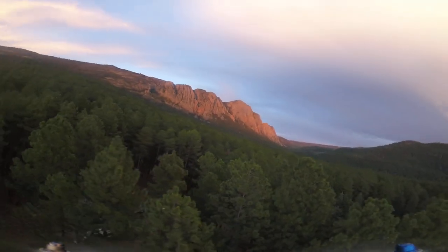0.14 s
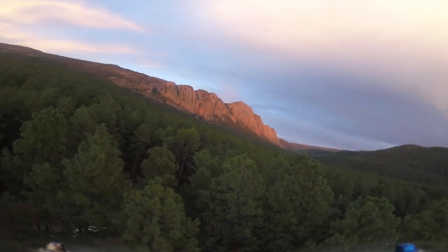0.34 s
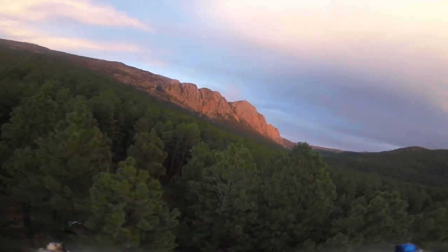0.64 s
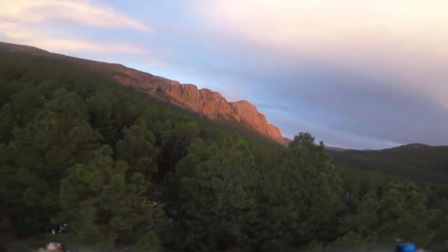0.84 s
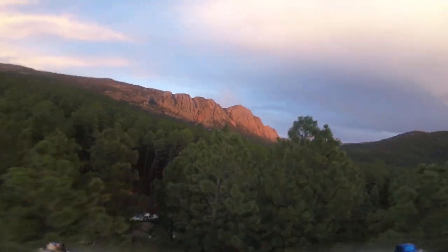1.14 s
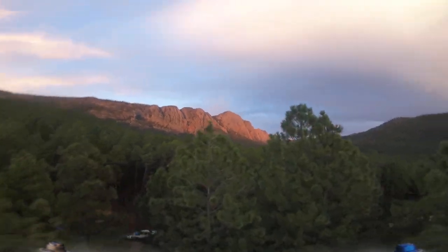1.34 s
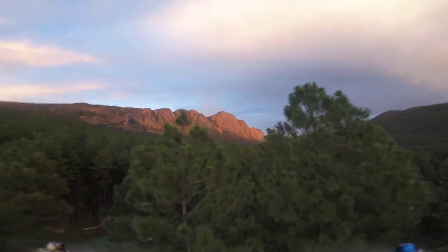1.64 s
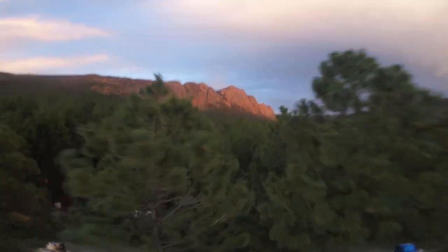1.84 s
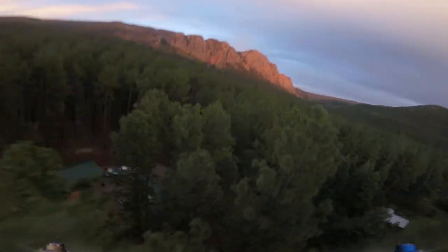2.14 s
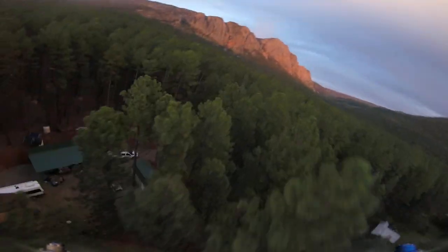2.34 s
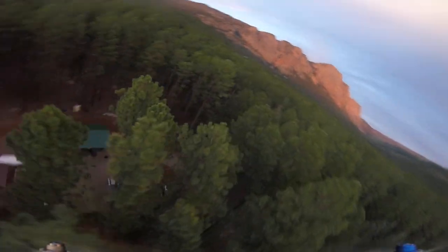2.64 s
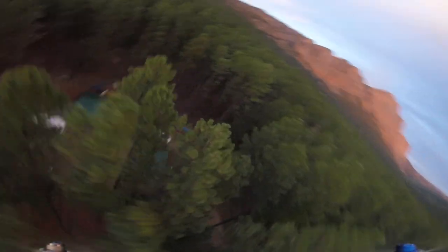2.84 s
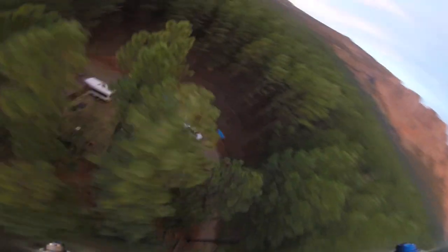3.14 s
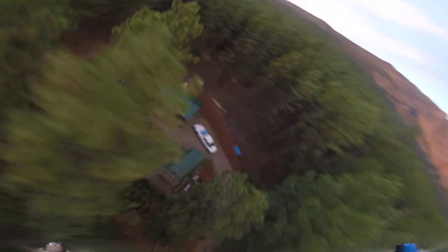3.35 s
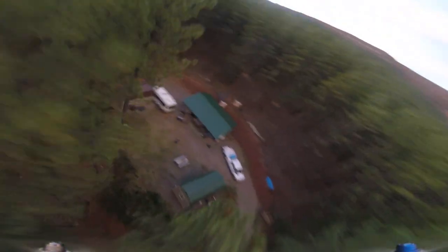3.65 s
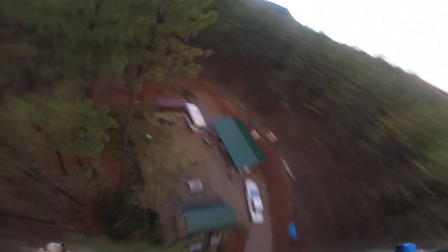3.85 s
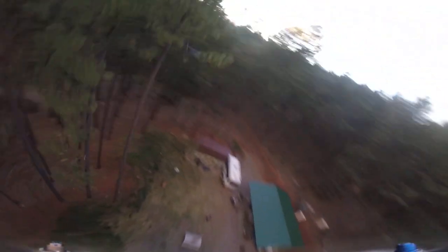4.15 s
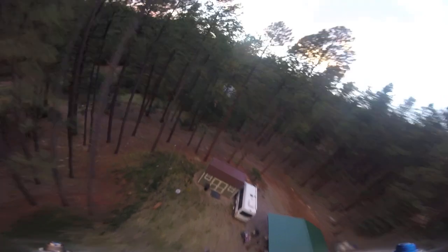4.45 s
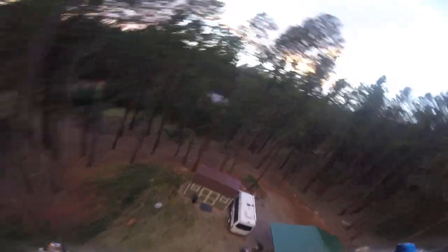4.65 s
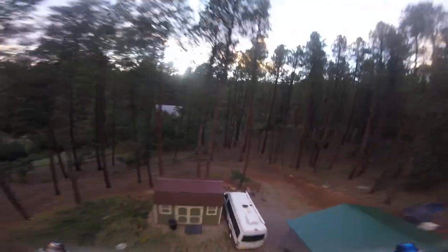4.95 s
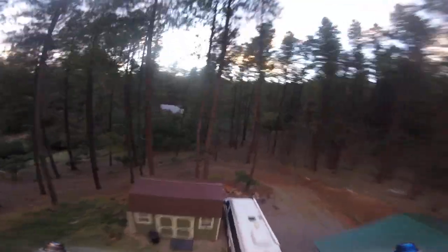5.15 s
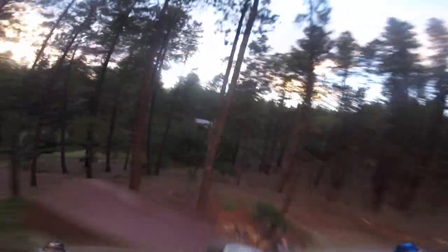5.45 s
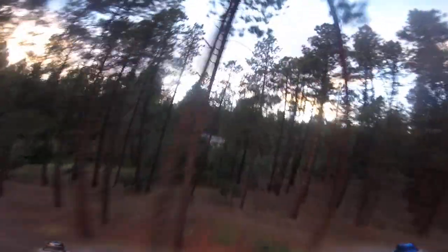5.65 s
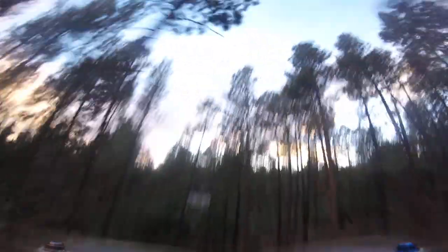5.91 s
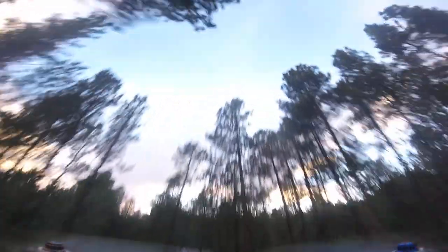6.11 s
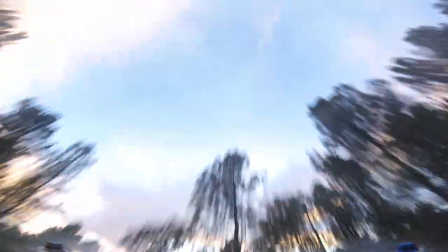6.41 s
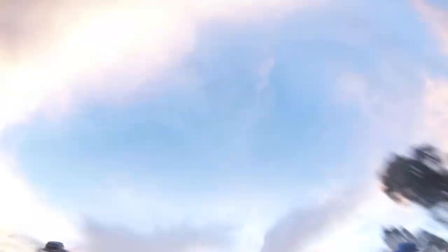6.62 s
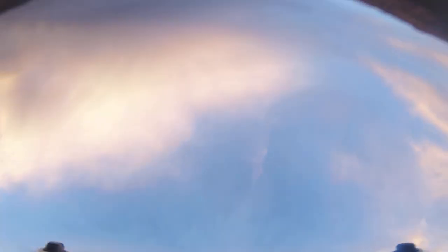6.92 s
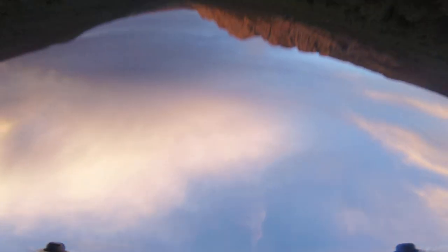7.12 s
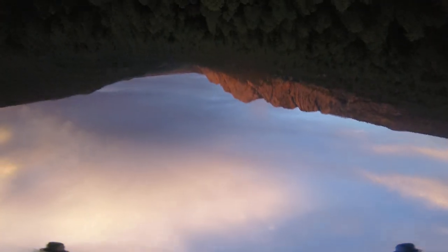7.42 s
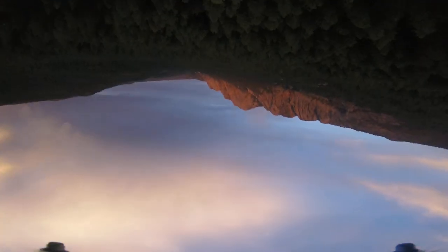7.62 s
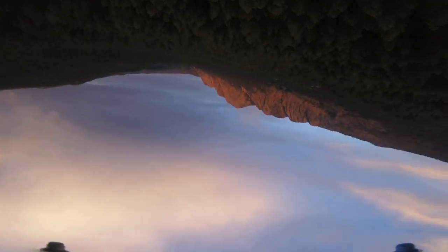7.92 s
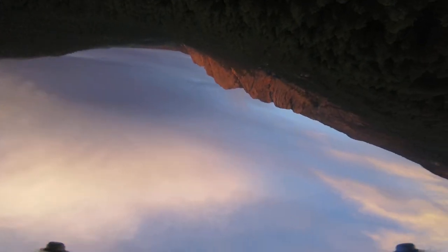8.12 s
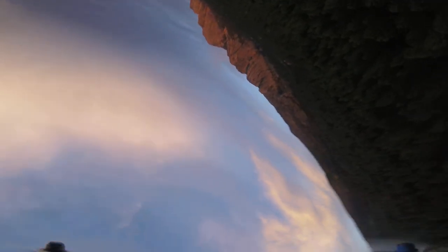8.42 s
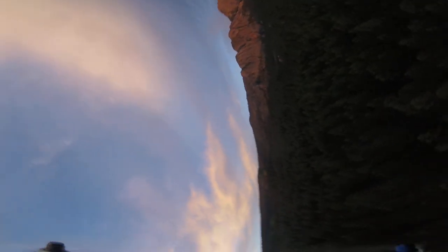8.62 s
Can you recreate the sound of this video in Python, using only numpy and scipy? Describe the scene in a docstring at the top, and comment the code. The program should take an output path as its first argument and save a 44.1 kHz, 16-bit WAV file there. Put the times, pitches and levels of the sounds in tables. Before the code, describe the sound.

Close drone propellers buzz and hiss, rising to a scream and falling to a low flutter, with wind rumbling on the microphone.

```python
"""A buzzing, beating drone swoops up and down in pitch: a racing quadcopter, heard from its own camera.
Four two-blade propellers run at slightly different speeds and chop turbulent air into roar and hiss.
They scream at full throttle and flap at idle. Magnets passing the stators add a faint motor whine;
the frame hums and ticks. Wind rumbles on the microphone and hisses across the case in a banked turn."""
import sys
import numpy as np
from scipy.fft import rfft, irfft, next_fast_len
from scipy.io import wavfile
from scipy.ndimage import uniform_filter1d, minimum_filter1d, map_coordinates

SR = 44100
rng = np.random.default_rng(int(sys.argv[2]) if len(sys.argv) > 2 else 0)


def dump(signal):
    """Clip the signal to [-1, 1] and save it as 16-bit WAV at the path in sys.argv[1]."""
    limited = np.clip(np.atleast_2d(signal).T, -1, 1)
    pcm = np.round(limited * 32767).astype(np.int16)
    wavfile.write(sys.argv[1], SR, pcm)


N = 386757


def amp(db):
    """Decibels to gain."""
    return 10 ** (np.asarray(db) / 20)


def unit(x):
    """Scale to rms 1."""
    return x / np.sqrt(np.mean(x ** 2) + 1e-20)


def steadied(x, window_s):
    """Rms 1 over a sliding window; faster beats stay."""
    return x / np.sqrt(np.abs(uniform_filter1d(x ** 2, int(window_s * SR))) + 1e-9)


def curves(rows):
    """One per-sample curve for each column after the time."""
    times_s, *columns = np.transpose(rows)
    return [np.interp(np.arange(N) / SR, times_s, column) for column in columns]


def wobble(rate_hz):
    """Smooth random curve, rate_hz knots a second."""
    knots = rng.standard_normal(int(N * rate_hz / SR) + 4)
    coarse = np.arange(0, N, 16)
    return np.interp(np.arange(N), coarse, map_coordinates(knots, [coarse * rate_hz / SR]))


def filtered(x, response):
    """Apply a gain given as a function of frequency."""
    size = next_fast_len(N + SR // 2)
    return irfft(rfft(x, size) * response(np.fft.rfftfreq(size, 1 / SR)), size)[:N]


def coloured(x, spectrum):
    """Filter by (Hz, dB) points joined on a log frequency axis."""
    points_hz, points_db = np.transpose(spectrum)
    return filtered(x, lambda hz: amp(np.interp(np.log(hz + 1), np.log(points_hz + 1), points_db)))


def noise(spectrum, gate=1):
    """Noise, gated, coloured and scaled to rms 1."""
    return unit(coloured(gate * rng.standard_normal(N), spectrum))


# throttle, propeller 1: (time [s], blade-pass rate [Hz])
THROTTLE = [(0, 250.6), (.82, 250.7), (1.25, 295), (1.56, 290), (1.93, 343), (2.0, 492), (2.055, 546.4),
            (2.11, 502), (2.25, 135.5), (3.05, 127.4), (3.14, 162), (3.2, 204), (3.27, 246), (3.42, 312),
            (3.5, 332), (3.76, 355), (3.84, 245), (3.95, 195), (4.1, 257), (4.32, 326), (4.65, 289),
            (4.85, 274), (5.11, 222), (5.2, 268), (5.28, 331), (5.47, 367), (5.6, 333), (5.75, 399),
            (5.87, 438), (6.03, 551), (6.14, 563), (6.32, 562), (6.38, 592), (6.83, 586), (6.88, 552),
            (6.95, 461), (7.03, 366), (7.19, 127.8), (7.45, 110.2), (8.3, 164), (8.45, 282), (8.77, 334.3)]


def blade_rate_hz():
    """Blade-pass rate of propeller 1; rotor inertia rounds the corners."""
    return uniform_filter1d(curves(THROTTLE)[0], size=1300)


def speed_gain_db(knee_hz, below_db_per_oct, above_db_per_oct, lead_s=0):
    """Level against blade rate, two slopes about a knee; torque leads speed by lead_s."""
    t = np.arange(N) / SR
    octaves = np.log2(np.interp(t + lead_s, t, blade_rate_hz()) / knee_hz)
    return below_db_per_oct * np.minimum(octaves, 0) + above_db_per_oct * np.maximum(octaves, 0)


# blade-rate offsets from propeller 1: (time [s], second [Hz], third [Hz], fourth [Hz])
STEERING = [(0, -4, 3, -30), (.8, -4, 4, -14), (1.15, -7, 13, -12), (1.8, -8, 20, -14),
            (2.06, -8, -25, -38), (2.4, -10, 10, -20), (3.2, 46, -22, 12), (3.36, 44.5, -6, 14),
            (3.52, 4.5, -22, 9), (3.76, 4, -30, -24), (3.95, -4.5, -8, 8.5), (4.15, 7.5, -8, 42),
            (4.3, 14, -22, 47), (4.5, 8, -24, 23.5), (4.75, -6, -24, 24), (4.86, -1, -20, 16),
            (4.98, -4, -18, 12), (5.15, -8, -5, 17.5), (5.3, -7, -16, 10), (5.5, 9, -28, -15),
            (5.75, -9, -52, -20), (6.05, -11, -42.5, -52.5), (6.3, -8, -48, -55.5), (6.4, -6, -52, -45.5),
            (6.82, -5, -50, -47), (6.94, 30, -8, 13), (7.05, 26, -10, 10), (7.2, -8.5, -25, 6),
            (7.65, -5.5, -14, 10), (8.35, -15, -21, 10.5), (8.52, -12, -53.5, 12), (8.62, -7, -22, 15),
            (8.72, -13.5, 22.5, -30.5)]
# levels against propeller 1: (time [s], second [dB], rear pair [dB])
LOAD = [(0, -4.5, -12.5), (1.1, -3.5, -8), (2.0, -7.5, -5), (3.25, -1.5, -10.5), (3.55, -12, -1.5),
        (3.8, -8.5, -5), (4.2, -9.5, -2.5), (4.7, -6, -6.5), (5.0, -6, -7), (5.4, -3, -4.5),
        (5.8, -12, -10.5), (6.1, -3, -2.5), (6.6, -5, -4), (6.95, -4, -11.5), (7.6, -2, -8.5),
        (8.77, -6.5, -3.5)]


def rotors(fourth_db=-3, hunt=0.004, flutter=0.0059, full_hz=520, kick=0.31, kick_hz=14, idle_hz=165):
    """(shaft angle, gain) per motor; near idle the controller kicks each one and it coasts down."""
    blade_hz = blade_rate_hz()
    second_db, rear_db = curves(LOAD)
    idling = 1 / (1 + (blade_hz / idle_hz) ** 10)
    headroom = 1 / (1 + (blade_hz / full_hz) ** 10)  # speed steadies at full throttle
    motors = []
    for offset_hz, db in zip([0, *curves(STEERING)], [0, second_db, rear_db, rear_db + fourth_db]):
        coast = .5 - np.cumsum(kick_hz * amp(2 * wobble(5)) / SR) % 1  # falling sawtooth
        wander = hunt * wobble(25) + flutter * wobble(160)
        shaft_hz = (blade_hz + offset_hz) / 2 * (1 + headroom * wander + kick * idling * coast)
        angle = 2 * np.pi * np.cumsum(shaft_hz) / SR + rng.uniform(0, 2 * np.pi)
        motors.append((angle, amp(db)))
    return motors


# wind on the microphone: (time [s], level [dB])
RUMBLE_LEVEL = [(0.03, -35), (0.1, -40), (0.7, -39.5), (1.3, -36), (1.54, -33), (1.75, -43), (2.15, -36.5),
                (2.36, -35.5), (2.55, -34.5), (2.73, -31.5), (2.92, -27.5), (3.3, -29), (3.62, -35.5),
                (3.88, -44), (4.2, -31.5), (4.32, -29), (4.43, -30.5), (5.02, -35), (5.65, -31),
                (6.72, -38), (6.87, -35.5), (7.65, -31.5), (7.88, -34.5), (7.97, -30.5), (8.16, -31),
                (8.35, -31), (8.55, -35.5), (8.7, -26), (8.77, -28.5)]
# its spectrum: (frequency [Hz], gain [dB])
RUMBLE_SPECTRUM = [(10, -23.5), (25, -10), (50, -3), (90, -4.5), (180, -8.5), (350, -10.5), (700, -18.5),
                   (1300, -29), (4000, -82.5), (11000, -110)]
# air across a case edge: (time [s], level [dB])
EDGE_LEVEL = [(3.0, -70), (3.23, -39), (3.72, -35.5), (3.9, -57), (4.101, -50.5), (4.6, -73)]
# its spectrum: (frequency [Hz], gain [dB])
EDGE_SPECTRUM = [(2300, -29), (3500, -3), (4600, 2.5), (5500, -2.5), (6050, -8.5), (6500, 2.5),
                 (7100, -6.5), (8500, -11), (9600, -18.5), (10600, -39)]
# even hiss of passing air: (time [s], level [dB])
AIR_LEVEL = [(0, -63), (2.3, -62), (2.9, -56.5), (5.05, -66), (7.2, -50.5), (8.3, -54)]
# its spectrum: (frequency [Hz], gain [dB])
AIR_SPECTRUM = [(1500, -40), (3000, -2), (4000, -3.5), (4900, -2), (5700, -5.5), (6500, -11), (8000, -18.5),
                (9500, -30), (10700, -48), (11600, -63.5)]


def airflow(buffet_db=5.0, lump_db=1.5):
    """Wind buffets the microphone, hisses past the case and, in the banked turn, over one edge."""
    downwash_db = speed_gain_db(knee_hz=253, below_db_per_oct=2, above_db_per_oct=6)
    rumble = unit(amp(lump_db * wobble(14)) * noise(RUMBLE_SPECTRUM))
    buffet = amp(curves(RUMBLE_LEVEL)[0] + buffet_db + downwash_db) * rumble
    edge_db = np.interp(np.arange(N) / SR, *np.transpose(EDGE_LEVEL), left=-120, right=-120)
    return buffet + amp(edge_db) * noise(EDGE_SPECTRUM) + amp(curves(AIR_LEVEL)[0]) * noise(AIR_SPECTRUM)


# ticks on the frame: (time [s], level [dB])
TICKS = [(0.387, -43.5), (0.571, -40), (0.922, -37.5), (1.3763, -38.5), (4.3987, -41), (4.441, -35.5),
         (4.765, -44), (5.786, -34.5), (6.5792, -37)]
# their spectrum: (frequency [Hz], gain [dB])
TICK_SPECTRUM = [(1000, 7), (5000, -1), (8500, 1), (11500, -11)]


def frame_ticks(gain_db=4, t60_s=0.0083):
    """Tiny dry ticks: fast-decaying noise bursts."""
    out = np.zeros(N + SR)
    t = np.arange(SR // 50) / SR
    for start_s, db in TICKS:
        burst = amp(db + gain_db - 60 * t / t60_s) * rng.standard_normal(len(t))
        out[round(start_s * SR):][:len(t)] += burst
    return coloured(out[:N], TICK_SPECTRUM)


# magnet poles passing stator teeth: (order [x shaft rate], level [dB])
COGGING = [(56, -58), (84, -64)]
# motor bell response: (frequency [Hz], gain [dB])
BELL_RESPONSE = [(2000, -29.5), (3300, -2.5), (4200, -3.5), (5000, 2), (5900, 2.5), (6250, -15.5),
                 (7000, -6.5), (8000, -25.5), (10000, -35.5), (10600, -25.5), (11200, -55)]


def motor_whine(motors, gain_db=-5, flicker_db=3, bearing_db=-62):
    """The motor bells sing as their magnets pass the stator, over a faint bearing hiss."""
    cogging = sum(gain * amp(db + flicker_db * wobble(47)) * np.sin(round(order) * angle)
                  for angle, gain in motors for order, db in COGGING)
    spin_db = speed_gain_db(knee_hz=262, below_db_per_oct=4, above_db_per_oct=0.5)
    whine = amp(gain_db + spin_db) * coloured(cogging, BELL_RESPONSE)
    return whine + amp(bearing_db) * noise(BELL_RESPONSE)


# upper cogging tone: (time [s], level [dB])
HIGH_WHINE_LEVEL = [(0, -74), (.85, -73), (.95, -90), (1.1, -120)]


def high_whine(flicker_db=2, jitter_rad=0.9):
    """In the opening level flight, the upper cogging tone holds as one thin line."""
    angle = np.pi * np.cumsum(blade_rate_hz()) / SR
    envelope = amp(curves(HIGH_WHINE_LEVEL)[0] + flicker_db * wobble(30))
    return envelope * np.sin(COGGING[1][0] * angle + jitter_rad * wobble(90))


# motor chirps: (time [s], length [s], shaft start [Hz], shaft end [Hz], level [dB], upper vs lower [dB])
CHIRPS = [(2.203, .035, 68, 52, -46, -12), (2.255, .06, 69, 52, -56, -8), (2.353, .07, 65, 57, -69, 2),
          (2.445, .06, 72, 57, -62, -5), (2.48, .035, 73, 65, -65, 5), (2.525, .04, 69, 62, -63, -8),
          (2.565, .05, 62, 72, -58, -6), (2.655, .09, 62.4, 53, -61, 5), (2.675, .05, 67, 58, -60, 6),
          (2.873, .11, 69, 64, -56, -6)]


def motor_chirps(gain_db=1):
    """After the throttle cut, single motors coast and catch; both cogging tones glide with the shaft."""
    out = np.zeros(N)
    for start_s, length_s, start_hz, end_hz, db, upper_db in CHIRPS:
        count = int(length_s * SR)
        angle = 2 * np.pi * np.cumsum(np.linspace(start_hz, end_hz, count)) / SR
        tones = np.sin(COGGING[0][0] * angle) + amp(upper_db) * np.sin(COGGING[1][0] * angle)
        out[round(start_s * SR):][:count] += amp(db + gain_db) * np.sqrt(np.hanning(count)) * tones
    return out


# frame hums: (centre [s], half length [s], motor [0-3], order [x shaft rate], level [dB])
HUMS = [(2.365, 0.018, 0, 3, -26.5), (3.59, 0.25, 0, 1, -27), (4.86, 0.033, 1, 4, -24.5),
        (4.972, 0.061, 2, 4, -20.5), (5.147, 0.03, 2, 4, -23.5), (7.399, .12, 2, 2, -29),
        (7.642, 0.077, 2, 2, -25), (8.343, 0.02, 0, 2, -23), (8.72, 0.024, 0, 1, -16.5)]


def frame_hum(motors):
    """One motor briefly sets the frame humming at a single shaft order."""
    t = np.arange(N) / SR
    out = np.zeros(N)
    for centre_s, half_s, motor, order, db in HUMS:
        angle, _ = motors[round(motor)]
        swell = amp(db) * np.exp(-((t - centre_s) / half_s) ** 2)
        out += swell * np.sqrt(2) * np.sin(round(order) * angle)
    return out


# churn of the air at the blades, least in the banked turn: (time [s], level [dB])
CHURN = [(0, 2.5), (1.0, 3.5), (1.5, 2.5), (1.7, 5), (1.9, 9), (2.0, 1.5), (2.08, -1.5), (2.19, 3),
         (2.33, -2), (2.58, -1.5), (2.68, 3), (3.03, 2.5), (3.11, 8.5), (3.23, 2), (3.6, -9.5), (3.88, -10),
         (4.05, -3), (4.3, 1.5), (5.08, 1), (5.27, 1), (5.55, -1.5), (5.7, 1), (5.85, 0.5), (6.1, -1),
         (6.8, -2), (6.98, -2), (7.1, -4), (7.33, -1), (7.5, 7), (7.7, 2.5), (8.25, 3.5), (8.45, 4),
         (8.58, 6.5), (8.77, -1)]
# low blade roar: (frequency [Hz], gain [dB])
ROAR_SPECTRUM = [(60, -19.5), (170, -0.5), (400, 12.5), (750, 7), (1080, 9.5), (1320, -10), (1700, -28.5),
                 (4000, -57.5), (11000, -100)]
# midrange wash: (frequency [Hz], gain [dB])
WASH_SPECTRUM = [(700, -26.5), (1100, -7), (1320, -5.5), (1550, 1.5), (2100, 1.5), (2650, 0), (2850, -7.5),
                 (3050, -23.5), (3400, -21.5), (4000, -44), (8000, -64), (11500, -91.5)]
# blade hiss: (time [s], level [dB])
HISS_LEVEL = [(0, 3), (1.5, 1.5), (1.85, 6.5), (1.93, 4.5), (2.02, -3.5), (2.2, 3), (2.6, 1), (3.1, 17),
              (3.2, 3), (3.32, 2), (3.6, -4), (3.9, -10), (4.3, 5), (5.1, 1), (5.4, 0.5), (5.75, 3.5),
              (6.1, 1), (6.86, -0.5), (6.97, 5), (7.04, 0), (7.15, 3), (8.45, 5), (8.6, 1.5), (8.77, -3)]
# its spectrum: (frequency [Hz], gain [dB])
HISS_SPECTRUM = [(1500, -38.5), (3000, 5.5), (4000, -4), (4900, -3), (5700, -7), (6500, -13), (8000, -19),
                 (9500, -29), (10700, -34.5), (11600, -61.5)]


def turbulence(motors, roar_db=-30, roar_share=0.89, wash_db=-25.5, hiss_db=-35, chop=0.38, gust_db=1.02):
    """Each blade pass sheds a noise puff that grows with speed; roar and wash also grow with churn."""
    churn_db = curves(CHURN)[0]
    speed_db = speed_gain_db(knee_hz=266, below_db_per_oct=13, above_db_per_oct=6.5, lead_s=0.0064)
    hiss_speed_db = speed_gain_db(knee_hz=357.6, below_db_per_oct=20.5, above_db_per_oct=10, lead_s=0.021)
    puffs = sum(gain * np.exp(chop * np.cos(2 * angle)) for angle, gain in motors)
    puffs = steadied(puffs, window_s=0.17) * amp(gust_db * wobble(60))
    roar = amp(roar_db + roar_share * churn_db + speed_db) * noise(ROAR_SPECTRUM, puffs)
    wash = amp(wash_db + churn_db + speed_db) * noise(WASH_SPECTRUM, puffs)
    hiss = amp(hiss_db + curves(HISS_LEVEL)[0] + hiss_speed_db) * noise(HISS_SPECTRUM, puffs)
    return roar + wash + hiss


# sharp tip pulses: (order [x shaft rate], level [dB])
TIP_PARTIALS = [(4, -18.5), (6, -17), (8, -24), (14, -34.5), (16, -34.5), (18, -35.5), (20, -41.5)]


def tip_scream(motors, onset_hz=435, rough_db=1.5, gain_db=-5, third_db=-10, sum_db=-25):
    """Near top speed the tips of propellers 1 and 3 add bright lines; their wakes meet in a sum tone."""
    flat_out = 1 / (1 + (onset_hz / blade_rate_hz()) ** 10)
    first, third = motors[0][0], motors[2][0]
    tips = sum(amp(gain_db + motor_db + db + rough_db * wobble(40)) * np.sin(round(order) * angle)
               for angle, motor_db in [(first, 0), (third, third_db)] for order, db in TIP_PARTIALS)
    sum_tone = amp(sum_db) * np.sin(2 * (first + third))
    return flat_out * (tips + sum_tone)


# propeller overtones, odd ones from imbalance: (order [x shaft rate], level [dB])
OVERTONES = [(1, -19), (3, -16), (4, -8.5), (5, -21), (6, -10.5), (7, -19), (8, -14.5), (10, -19.5),
             (12, -19)]
# all overtones together: (time [s], level [dB])
BUZZ_LEVEL = [(0, -3), (1.0, 1), (1.5, 0), (1.8, 4), (2.1, 0), (3.25, 3.5), (3.45, -0.5), (3.7, -1),
              (3.92, -4.5), (4.35, 1.5), (4.6, 0.5), (4.9, 0), (5.1, -1.5), (5.4, 0), (5.68, -2),
              (6.1, -2.5), (6.85, -4.5), (7.02, -1.5), (8.4, 1.5), (8.77, -3)]
# path through the frame to the microphone: (frequency [Hz], gain [dB])
FRAME_RESPONSE = [(60, -19), (250, 9), (400, 4.5), (560, -2), (690, 0.5), (820, -0.5), (990, 2),
                  (1170, 0.5), (1350, -3.5), (1700, -29.5), (2700, 1), (3100, -12.5)]


def blade_buzz(motors, gain_db=-15, rough_db=3, smear_rad=0.36, clean_hz=440, bright_db=3, evenness=0.38):
    """Overtones brighten with tip speed; below full thrust the blades' own wake smears their phase."""
    blade_hz = blade_rate_hz()
    tip_octaves = np.log2(blade_hz / blade_hz.max())
    wake_rad = smear_rad / (1 + (blade_hz / clean_hz) ** 6)
    shares = [(angle, gain ** (1 - evenness)) for angle, gain in motors]
    buzz = np.zeros(N)
    for order, db in OVERTONES:
        order = round(order)
        strength = amp(db + bright_db * tip_octaves * np.log2(max(order / 4, 1)))
        for angle, share in shares:
            phase = order * angle + wake_rad * wobble(70)
            buzz += strength * share * amp(rough_db * wobble(90)) * np.sin(phase)
    buzz /= np.sqrt(sum(share ** 2 for _, share in shares))
    return amp(gain_db + curves(BUZZ_LEVEL)[0]) * coloured(buzz, FRAME_RESPONSE)


# blade-pass tones and idle flapping: (time [s], level [dB])
BLADE_LEVEL = [(0, 2), (1.1, 0.5), (2.05, 4), (2.15, 2.5), (2.55, -9.5), (3.0, 1), (3.14, 10), (3.22, 9),
               (3.32, 1), (3.45, 4.5), (3.7, 6.5), (3.92, -0.5), (4.7, 3.5), (5.05, -7.5), (5.4, 5),
               (5.62, -0.5), (5.78, 3.5), (6.85, 0.5), (6.97, 2), (7.1, -8.5), (7.3, -5.5), (7.6, 1),
               (8.77, -2.5)]
# idling blades flapping in the airstream: (frequency [Hz], gain [dB])
STALL_SPECTRUM = [(50, -25), (85, 2), (125, -0.5), (200, 0), (350, 0.5), (520, -8), (750, -9), (1000, -11),
                  (1250, -31.5), (3000, -70), (11000, -110)]


def propellers(motors, tone_db=-17, rough_db=1.5, churn_share=0.56, jitter_rad=0.13,
               stall_hz=180, stall_db=-17):
    """Four blade-pass tones beat together and flutter in churned air; idling blades flap instead."""
    blade_db = curves(BLADE_LEVEL)[0]
    thrust_db = speed_gain_db(knee_hz=282, below_db_per_oct=11, above_db_per_oct=5.5, lead_s=0.025)
    shake = amp(churn_share * curves(CHURN)[0])
    tones = np.zeros(N)
    for angle, gain in motors:
        flutter = amp(rough_db * shake * wobble(70))
        tones += gain * flutter * np.sin(2 * angle + jitter_rad * shake * wobble(90))
    drone = amp(tone_db + blade_db) * steadied(tones, window_s=0.24) + blade_buzz(motors)
    flapping = amp(stall_db + blade_db) * noise(STALL_SPECTRUM)
    driven = 1 / (1 + (stall_hz / blade_rate_hz()) ** 10)
    return amp(thrust_db) * (driven * drone + (1 - driven) * flapping)


def scene():
    """Mono mix. Everything rides with the camera: no Doppler shift, no room."""
    motors = rotors()
    blades = propellers(motors) + tip_scream(motors) + turbulence(motors)
    whines = motor_whine(motors) + high_whine() + motor_chirps()
    return (airflow() + frame_ticks() + whines + frame_hum(motors) + blades)[None]


def record(dry, ceiling=0.52, release_db_per_s=26, top_hz=12000):
    """The camera's gain control ducks fast on peaks and recovers slowly; its band ends at top_hz."""
    over_db = 20 * np.log10(np.maximum(1, np.abs(dry[0]) / ceiling))
    recovery_db = release_db_per_s * np.arange(N) / SR
    duck_db = np.maximum.accumulate(over_db + recovery_db) - recovery_db
    gain = uniform_filter1d(minimum_filter1d(amp(-duck_db), size=200), size=300)
    return filtered(dry[0] * gain, lambda hz: hz < top_hz)[None]


dry = scene()
out = record(dry)
dump(out)
```